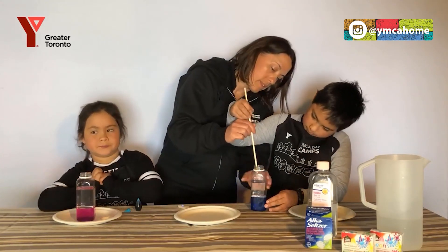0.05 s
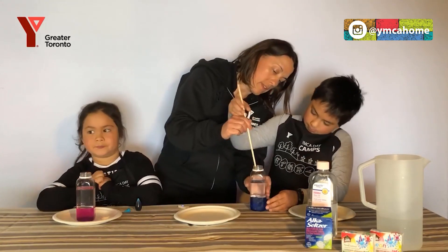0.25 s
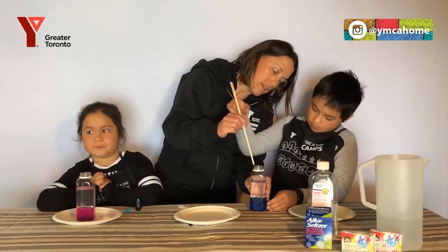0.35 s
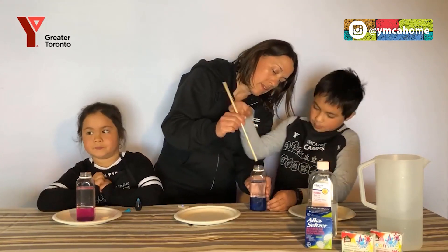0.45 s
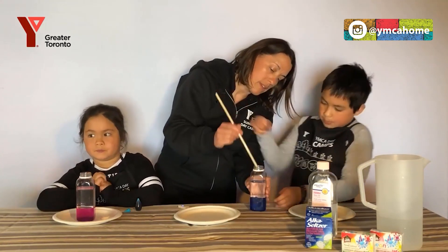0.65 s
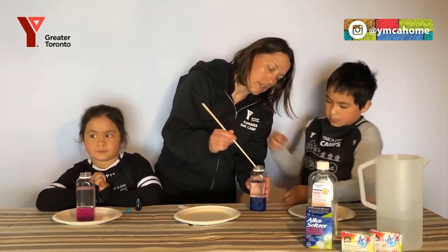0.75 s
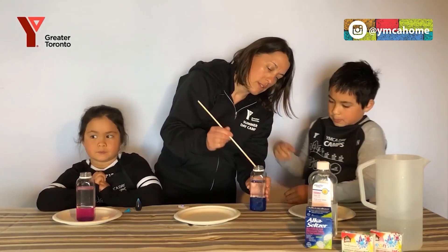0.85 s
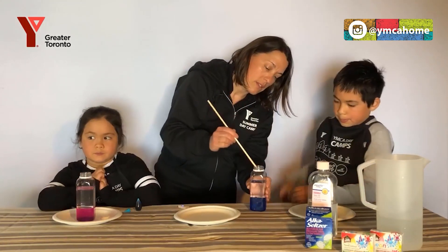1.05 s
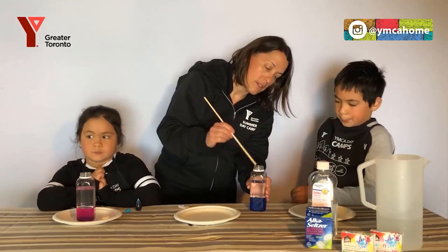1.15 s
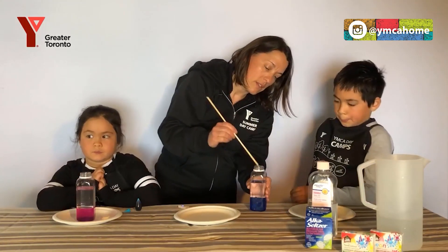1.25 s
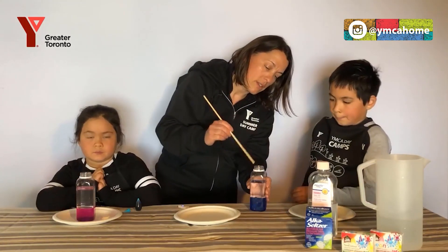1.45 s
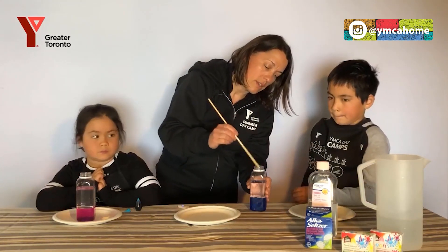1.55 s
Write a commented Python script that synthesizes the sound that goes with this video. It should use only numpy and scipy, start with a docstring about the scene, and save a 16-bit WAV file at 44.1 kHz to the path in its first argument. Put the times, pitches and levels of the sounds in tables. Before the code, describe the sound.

A thin wooden stick knocks lightly inside a plastic bottle while stirring liquid.

```python
"""A thin wooden stick stirs liquid in a small plastic bottle and knocks against its wall.
Each knock makes the wall clack, the hollow bottle answer and both stick and bottle ring briefly.
Between knocks the stick rubs softly. Clothing rustles close to the microphone, drags over it
and bumps it with dull thumps. Behind it all is the low noise of an ordinary room."""
import sys
import numpy as np
from scipy import signal
from scipy.fft import rfft, irfft
from scipy.io import wavfile

SR = 44100
rng = np.random.default_rng(int(sys.argv[2]) if len(sys.argv) > 2 else 0)


def master(y):
    """Save y as 16-bit WAV."""
    cut = np.clip(np.atleast_2d(y).T, -1, 1)
    pcm = np.round(cut * 32767)  # scale
    wavfile.write(sys.argv[1], SR, pcm.astype(np.int16))


N = 70560
T = np.arange(N) / SR


def from_db(db):
    """Turn decibels into a number to multiply a sound by."""
    return 10 ** (np.asarray(db) / 20)


def unit_rms(x):
    """Scale a sound so its average strength (rms) is 1."""
    return x / np.sqrt(np.mean(x ** 2) + 1e-20)


def gain_over_time(curve):
    """Join (time [s], level [dB]) points into a gain for every sample."""
    return from_db(np.interp(T, *np.transpose(curve)))


def gain_at(spectrum, hz):
    """Look up gains between (frequency [Hz], level [dB]) points."""
    points_hz, db = np.transpose(spectrum)
    return from_db(np.interp(np.log(hz + 1), np.log(points_hz), db))


def colour(x, spectrum):
    """Set a sound's balance of low and high frequencies, at strength 1."""
    gains = gain_at(spectrum, np.fft.rfftfreq(N, 1 / SR))
    return unit_rms(irfft(rfft(x) * gains, N))


def keep_range(x, hz, kind, order=2):
    """Filter a sound to keep its "low" part, its "high" part or one "band"."""
    sections = signal.butter(order, np.clip(hz, 10, .45 * SR), kind, fs=SR, output="sos")
    return signal.sosfilt(sections, x + 1e-18)


def struck(start, rise, fade):
    """Loudness after a blow: a quick rise, then a 60 dB fall in `fade` seconds."""
    out = np.zeros(N)
    live = (T > start) & (T < start + 2 * fade)
    age = T[live] - start
    out[live] = (1 - np.exp(-age / rise)) * np.exp(-np.log(1000) * age / fade)
    return out


def swell(peak, half_length):
    """Loudness that grows smoothly to a peak and falls away again."""
    return np.exp(-((T - peak) / half_length) ** 2)


def friction(slips_per_s=2500, spread_db=2.5, slip_share=0.4):
    """Rubbing surfaces make tiny random slips of uneven size over a smooth hiss."""
    slips = (rng.random(N) < slips_per_s / SR) * rng.choice([-1, 1], N)
    sizes = from_db(spread_db * np.minimum(rng.exponential(1, N), 4))
    hiss = rng.standard_normal(N)
    return np.sqrt(slip_share) * unit_rms(slips * sizes) + np.sqrt(1 - slip_share) * hiss


# Tone of the quiet room: (frequency [Hz], relative level [dB])
ROOM_TONE = [(25, 1), (55, 8), (100, 5.5), (160, 6.5), (300, 2), (800, 0), (1300, -6.5), (3000, -11.5),
             (7000, -15.5), (15000, -19)]

def room_noise(level_db=-60):
    """The room makes a faint, steady, mostly low noise."""
    return from_db(level_db) * colour(rng.standard_normal(N), ROOM_TONE)


# How loud the clothes rustle: (time [s], level [dB])
RUSTLE_LEVELS = [(0, -61.5), (.04, -77), (.2, -89), (.23, -63.5), (.3, -59.5), (.36, -53), (.405, -55),
                 (.44, -70.5), (.52, -67), (.6, -60), (.73, -65), (.77, -57.5), (.83, -63), (.94, -58.5),
                 (1.03, -62), (1.1, -55.5), (1.17, -67), (1.25, -67), (1.295, -51.5), (1.38, -65),
                 (1.5, -85), (1.54, -59.5), (1.6, -87)]
# Tone of the rustle: (frequency [Hz], relative level [dB])
RUSTLE_TONE = [(150, 2.5), (700, 4.5), (1500, -0.5), (2600, -5.5), (4500, 1.5), (6500, 1), (9000, -2),
               (13000, -7), (16000, -13)]
# Sleeves brushing past: (peak time [s], level [dB], half length [s])
SLEEVE_SWISHES = [(0.38, -63, 0.035), (0.764, -59.5, 0.021), (0.946, -64, .04)]
# Airy tone of a swish: (frequency [Hz], relative level [dB])
SWISH_TONE = [(4000, -25), (8000, -9), (12500, 3), (16000, -4)]

def clothing():
    """Rubbing cloth makes a grainy rustle, with airy swishes as sleeves brush past."""
    rustle = gain_over_time(RUSTLE_LEVELS) * colour(friction(), RUSTLE_TONE)
    swish_gain = sum(from_db(db) * swell(peak, half) for peak, db, half in SLEEVE_SWISHES)
    return rustle + swish_gain * colour(friction(), SWISH_TONE)


# How loud the stick rubs in the liquid: (time [s], level [dB])
RUB_LEVELS = [(0, -104), (.2, -69), (.25, -60), (.38, -65.5), (.45, -72), (.52, -57.5), (.72, -59),
              (.86, -55.5), (.97, -57), (1.02, -60.5), (1.105, -57), (1.15, -55), (1.22, -65), (1.3, -54.5),
              (1.39, -65.5), (1.47, -58.5), (1.6, -62.5)]
# Tone of the rubbing: (frequency [Hz], relative level [dB])
RUB_TONE = [(150, -3.5), (450, 1.5), (750, -1.5), (1200, 2.5), (2400, 1), (4200, -4), (6500, -15.5),
            (15000, -16.5)]
# The stick slides up to a knock: (peak time [s], level [dB], half length [s], middle frequency [Hz])
STICK_SLIDES = [(1.1, -52, 0.027, 3500)]

def stirring(slide_width_hz=1400):
    """The stick rubs along the wall, with a brighter scrape when it slides."""
    out = gain_over_time(RUB_LEVELS) * colour(friction(), RUB_TONE)
    for peak, db, half_length, hz in STICK_SLIDES:
        band_hz = [hz - slide_width_hz / 2, hz + slide_width_hz / 2]
        scrape = unit_rms(keep_range(friction(), band_hz, "band", order=1))
        out += from_db(db) * swell(peak, half_length) * scrape
    return out


# Soft bumps on the microphone: (time [s], level [dB], pitch [Hz], fade time [s], overtone [dB])
MIC_BUMPS = [(0.2215, -33.5, 235.2, 0.082, -16), (0.231, -39.5, 92.1, 0.24, -27),
             (0.234, -38, 51.5, 0.19, -25), (0.2561, -37.5, 252, 0.064, -17),
             (.5160, -26.5, 156, 0.14, -4.5), (0.541, -27.5, 148, 0.071, -15),
             (0.576, -49.5, 154.7, 0.41, -9), (0.754, -53, 98.5, 0.42, -12), (1.2775, -32, 153, 0.089, -26),
             (1.3327, -29, 153.6, 0.081, -14), (1.346, -35, 93.5, 0.19, -8.5)]

def microphone_bumps(rise_s=0.0048, overtone_ratio=2.7):
    """Each bump sets the microphone's mount swinging: a low thump and a shorter, higher overtone."""
    out = np.zeros(N)
    for start, db, hz, fade, overtone_db in MIC_BUMPS:
        phase = 2 * np.pi * hz * (T - start)
        thump = struck(start, rise_s, fade) * np.sin(phase)
        overtone = struck(start, rise_s / 2, fade / 2) * np.sin(overtone_ratio * phase)
        out += from_db(db) * (thump + from_db(overtone_db) * overtone)
    return out


# Cloth drags around the bumps: (time [s], level [dB], length [s], muffled above [Hz])
CLOTH_DRAGS = [(0.222, -53.5, 0.0039, 1470), (.228, -50.5, 0.052, 260), (0.497, -51.5, 0.074, 530),
               (0.509, -47, 0.0075, 1300), (0.562, -61, 0.058, 91), (0.678, -59.5, 0.12, 250),
               (1.231, -55, 0.037, 495), (1.278, -51.5, 0.068, 580), (1.328, -53.5, .005, 720)]

def cloth_drags(rise_s=0.001, release_s=0.023):
    """Cloth drags over the microphone in muffled bursts that rise, hold and die away."""
    out = np.zeros(N)
    for start, db, length, bright_hz in CLOTH_DRAGS:
        rise = np.clip((T - start) / rise_s, 0, 1)
        release = np.exp(-np.maximum(T - start - length, 0) / release_s)
        muffled = keep_range(friction(), bright_hz, "low", order=3)
        rub = unit_rms(keep_range(muffled, hz=40, kind="high"))
        out += from_db(db) * rise * release * rub
    return out


# Tone of the thin wall's short shudder: (frequency [Hz], relative level per hertz [dB])
CLACK_TONE = [(200, -55), (450, -8), (680, -1), (1000, -6.5), (1500, -6), (1850, -2.5), (2150, 1),
              (2450, 2), (2800, -8.5), (3400, -8.5), (4400, -5), (5500, -4.5), (7800, -11.5), (9700, -7.5),
              (11500, -12.5), (15000, -14)]
# Notes that stick and bottle ring with: (pitch [Hz], relative level [dB], fade time [s])
RING_NOTES = [(641, -49, 0.11), (1100, -47, 0.099), (1232, -40, 0.1), (1618, -47.5, 0.13),
              (2010, -49, 0.054), (2381, -37.5, 0.071), (2450, -46, 0.19), (2650, -49.5, 0.076),
              (2890, -46, 0.11), (3485, -57, 0.14), (4430, -43, .07), (4490, -43, 0.038),
              (5550, -42, 0.044)]
# The stick hits the bottle: (time [s], level [dB], dulled above [Hz], low notes [dB], high notes [dB],
# hollow boost [dB], clack fade time at 2000 Hz [s], ring rise time [s])
STICK_KNOCKS = [(0.4758, -11, 14500, -2.5, -26, 19.5, 0.052, 0.00089),
                (0.7994, -3.5, 4300, -8, 1, 12, 0.052, 0.0018),
                (1.1193, -5.5, 6400, -0.5, -0.5, 11, 0.023, .001),
                (1.4181, 0.5, 8800, -1, 0, -4, 0.026, 0.00093),
                (1.5345, -12, 2930, 11, 2, 8.5, 0.073, 0.0058),
                (1.5661, -12.5, 6000, -10, -14, -6, 0.016, .001)]

def knocks():
    """Each knock cracks, shakes the wall and hollow bottle, rings, and echoes briefly in the room."""
    crack_db, crack_above_hz, clack_db, echo_db = -42.5, 1900, -35, -42.5
    hollow_hz, hollow_octaves, hollow_rise_s = 710, 0.96, 0.0033
    note_split_hz = 1850  # where the stick lands favours the notes below or above this
    # Split noise into bands so that each can fade at its own speed.
    edges = np.geomspace(180, 16000, 29)
    centres = np.sqrt(edges[1:] * edges[:-1])
    gains = gain_at(CLACK_TONE, centres) * np.sqrt(np.diff(edges))
    gains /= np.linalg.norm(gains)
    bands = [gain * unit_rms(keep_range(rng.standard_normal(N), [low, high], "band", order=3))
             for gain, low, high in zip(gains, edges, edges[1:])]
    out = np.zeros(N)
    for start, db, bright_hz, low_db, high_db, hollow_db, clack_fade, ring_rise in STICK_KNOCKS:
        hit = np.zeros(N)
        for hz, band in zip(centres, bands):
            # The hollow bottle answers lower and later than the wall.
            hollow = np.exp(-(np.log2(hz / hollow_hz) / hollow_octaves) ** 2)
            rise = 1 / hz + hollow * hollow_rise_s
            fade_scale = (2000 / hz) ** 0.25  # high sounds die sooner
            clack = from_db(clack_db + hollow * hollow_db) * struck(start, rise, clack_fade * fade_scale)
            crack = from_db(crack_db) * struck(start, 1 / hz, fade=0.0085) if hz > crack_above_hz else 0
            echo = from_db(echo_db) * struck(start, rise=0.0049, fade=0.22 * fade_scale)
            hit += band * (crack + clack + echo)
        for hz, note_db, fade in RING_NOTES:
            contact_db = low_db if hz < note_split_hz else high_db
            note = np.sin(2 * np.pi * (hz * (T - start) + rng.random()))
            strength = from_db(note_db + contact_db + rng.normal(0, 1.0))
            hit += strength * struck(start, ring_rise, fade) * note
        # Each knock is dulled above its own frequency.
        out += from_db(db) * keep_range(hit, bright_hz, "low", order=1)
    return out


def scene():
    """Room, clothing, stick and bottle all reach one microphone."""
    mix = room_noise() + clothing() + stirring() + microphone_bumps() + cloth_drags() + knocks()
    return mix[None]


def record(dry):
    """The recorder drops the deepest rumble and the very highest hiss."""
    rumble_hz, top_hz = 35, 15850
    top_cut = signal.ellip(10, .1, 60, top_hz, fs=SR, output="sos")
    return signal.sosfilt(top_cut, keep_range(dry, rumble_hz, "high"))


dry = scene()
out = record(dry)
master(out)
```